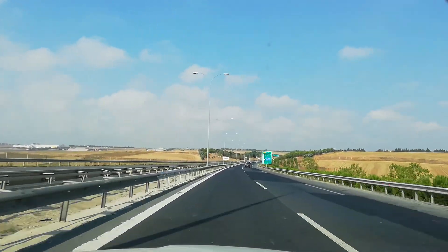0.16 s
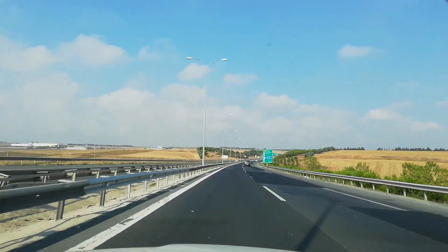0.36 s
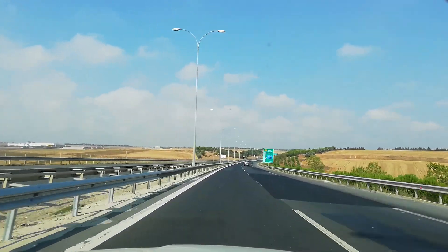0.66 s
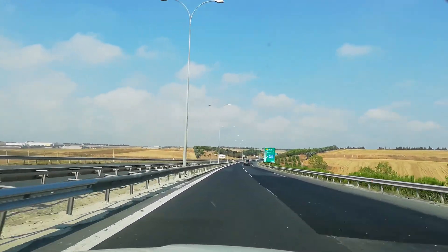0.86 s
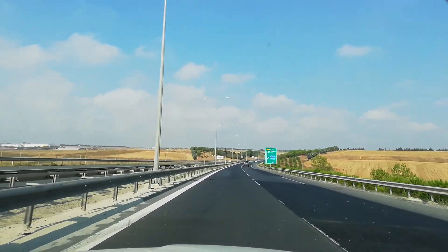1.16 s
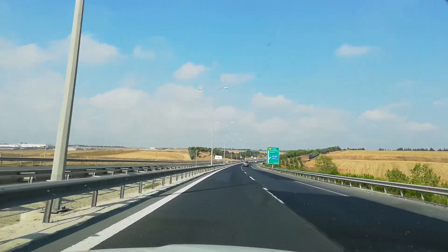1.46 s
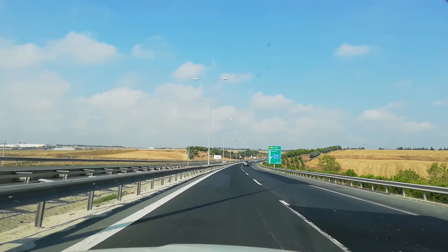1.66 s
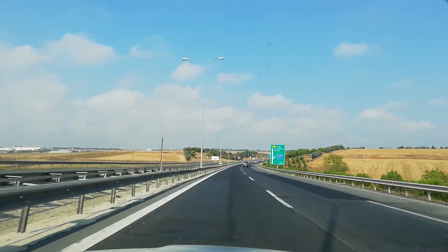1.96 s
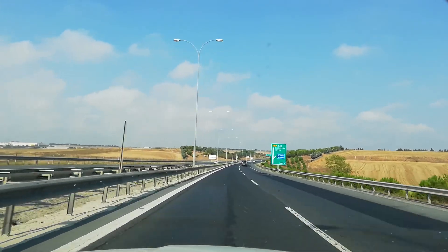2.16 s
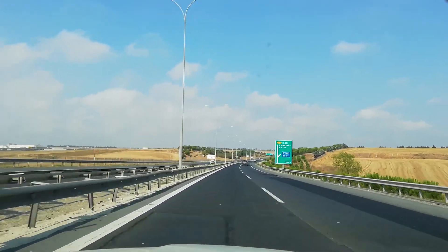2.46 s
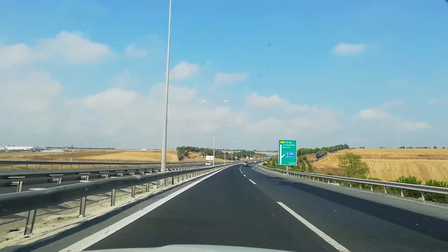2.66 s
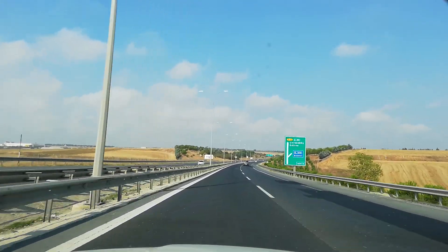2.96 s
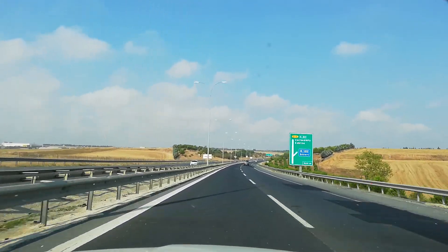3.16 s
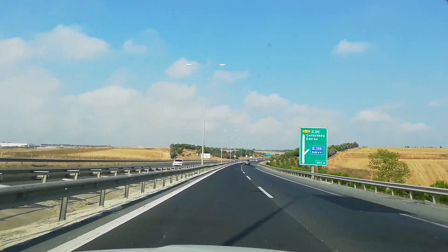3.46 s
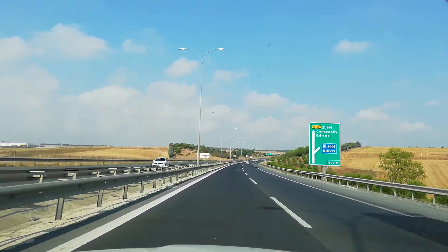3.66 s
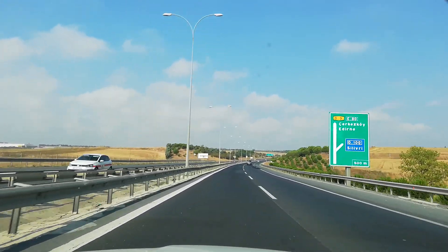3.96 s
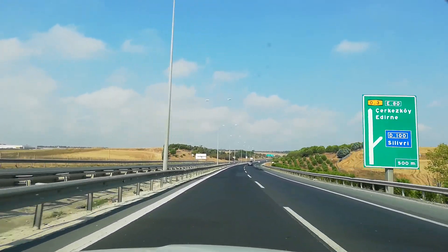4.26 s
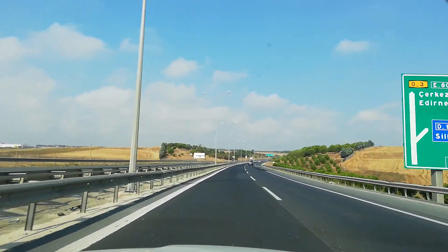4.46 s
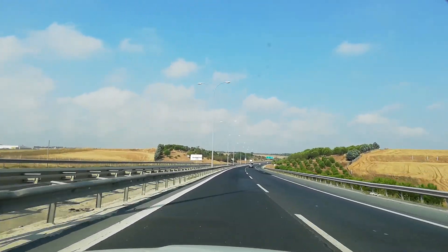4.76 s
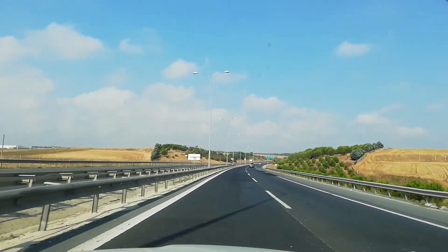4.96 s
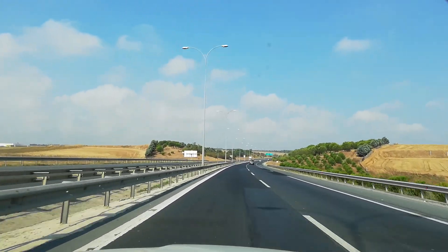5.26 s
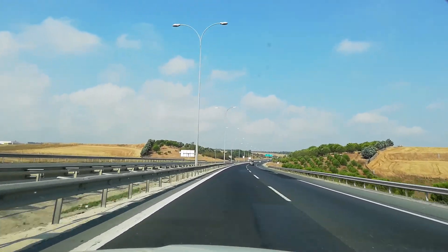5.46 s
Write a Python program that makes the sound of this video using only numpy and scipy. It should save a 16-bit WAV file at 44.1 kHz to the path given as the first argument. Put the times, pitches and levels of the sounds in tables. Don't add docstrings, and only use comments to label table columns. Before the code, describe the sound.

Steady low cabin rumble of a car at motorway speed, swelling over rough patches, while loose plastic trim rustles and ticks faintly.

```python
import sys
import numpy as np
from scipy import signal
from scipy.fft import rfft, irfft, next_fast_len
from scipy.io import wavfile
from scipy.ndimage import uniform_filter1d

SR = 44100
rng = np.random.default_rng(int(sys.argv[2]) if len(sys.argv) > 2 else 0)


def how_loud(loudness_db):
    steps = np.asarray(loudness_db, float) / 20
    return 10 ** steps


def log_audio(samples):
    frames = np.atleast_2d(samples).T
    limited = np.clip(frames, -1, 1)
    pcm = np.round(limited * 32767).astype(np.int16)
    wavfile.write(sys.argv[1], SR, pcm)


N = 246945
STEP = 32
ROAR_LAG_S, SHAKE_LAG_S = 0.000594, 0.00016

# (centre [Hz], width [Hz], level [dB])
SUSPENSION_MODES = [(13.7, 3.5, -0.5), (23, 6, 4.5), (38.5, 9.4, -5)]
CABIN_AIR_MODES = [(50.1, 7.4, 0.3), (64.5, 17, -5), (81.3, 14.5, -8)]
FLOOR_MODES = [(124.1, 7.2, 1.6), (141.1, 31.4, -1.4), (98, 30, -2.8)]
DOOR_MODES = [(195, 54, -0.5), (224.7, 17.6, -2.5), (256, 48, -4)]
SMOOTH_DB = [-32.5, -30, -29.5, -33]
YIELD_DB = [0.1, 3.4, 1.9, -1]
WAVE_SHARE = [1.7, 0.78, .4, 0.047]
# (time [s], level [dB])
WAVINESS = [(0, -1), (.35, -0.5), (.7, 2.5), (1.4, -1), (1.75, 0), (2.3, 6), (3.0, 1.5), (3.3, 0.1),
            (4.15, 0), (4.8, 2.5), (5.15, -0.5), (5.6, 3)]
# (middle [s], length [s], level [dB], shaking rate [Hz])
BUMPS = [(0.442, 0.1, -15, 130), (0.514, 0.083, -14, 23), (0.538, 0.19, -15.5, 111), (0.61, 0.265, -22, 52),
         (0.855, 0.33, -27, 139), (0.892, .26, -23, 48), (1.283, 0.32, -22.5, 70), (2.0, 0.34, -26.5, 195),
         (1.86, 0.15, -22, 152), (1.946, 0.19, -19.5, 135.5), (2.025, 0.12, -12.5, 63.3),
         (2.115, 0.053, -10.5, 54.3), (2.225, 0.45, -21, 115), (2.34, 0.27, -18, 52),
         (2.285, 0.5, -18, 22.5), (2.564, 0.07, -13, 21.8), (2.688, 0.3, -15, 28.2),
         (2.797, 0.28, -22.5, 212), (2.871, 0.23, -16, 126), (2.9, 0.55, -15.5, 24.2),
         (2.945, 0.27, -18, 54.5), (3.11, 0.18, -23, 72), (3.826, 0.059, -32, 55), (4.35, 0.18, -28, 134),
         (4.5, .12, -30, 52), (4.693, 0.11, -21, 240), (4.82, 0.37, -22.5, 40), (3.38, 0.069, -31, 125),
         (5.575, 0.29, -10.5, 33), (0.235, 0.24, -27, 109)]
# (frequency [Hz], likeness [0-1], extra left lag [rad], left minus right [dB])
SHAKE_PORTS = [(70, 1, 0.016, 0.1), (95, 0.99, 0.052, -0.4), (128, 0.99, 0.094, 0.2),
               (202, .96, .05, -0.15), (266, 0.87, .2, -1.5)]

# (frequency [Hz], density [dB/Hz])
ROAR_COLOUR = [(150, -61), (260, -8), (360, 1.5), (430, -20), (700, -13), (1000, -17.5), (1500, -22),
               (2000, -28), (2600, -35.5), (4300, -37), (6000, -47.5), (9000, -53), (15500, -76)]
# (centre [Hz], width [Hz], density [dB/Hz])
ROAR_RINGS = [(290.9, 19, 4.5), (326, 60, -8.5), (445, 20, -8), (463.7, 21, -6.5), (592, 48, -14.5),
              (765.3, 9.7, 1), (880, 56, -18), (1074, 29, -17), (1307, 10.3, -8), (1633, 7.9, -15),
              (1996, 13, -29.5), (2070, 41, -32), (2230, 40, -29.5)]
# (time [s], level [dB])
ROAR_SWELL = [(0.0, -47.5), (0.3, -47.5), (0.56, -49.5), (0.75, -48), (1.7, -47), (2.39, -49.5),
              (2.7, -48.5), (2.97, -49), (3.2, -47), (4.3, -46.5), (5.6, -47.5)]
# (frequency [Hz], likeness [0-1], extra left lag [rad], left minus right [dB])
ROAR_PORTS = [(340, 0.3, 0.5, -4), (411, 0, 0.45, -6), (432, 0, 1.13, -0.5), (575, 0.88, 1.5, 0.5),
              (780, 0.74, 0.27, -5), (1070, 0.68, 0.15, 0), (1300, 0, 0.12, -12.5),
              (1380, 0.36, 0.12, -0.5), (1700, 0.22, .1, -9), (1830, 0, 0.07, -4.5), (2030, 0, .1, -4),
              (4300, 0.2, 0.08, -5.5), (6400, 0, .1, -6.5), (15000, .05, .1, -2.5)]

# (frequency [Hz], density [dB/Hz])
RUSTLE_COLOUR = [(2500, -29.5), (4200, -13.5), (6000, -12), (7600, -4), (10300, -1), (12500, -10),
                 (15500, -20)]
# (frequency [Hz], likeness [0-1], extra left lag [rad], left minus right [dB])
RUSTLE_PORTS = [(6000, 0.1, .1, 2), (8000, .2, .1, -7), (10500, 0, .1, -17), (15000, .2, .1, -4)]
# (start [s], length [s], final level [dB], swell [dB])
RUBS = [(.05, 0.073, -61.5, 8), (0.129, 0.027, -60, -1), (.4, 0.057, -64.5, 6), (0.497, .19, -65, 5),
        (1.995, .17, -62, 9), (2.168, .22, -59.5, 0), (2.386, .045, -55.5, -2), (2.436, 0.04, -55, 2),
        (2.583, .035, -70, 4), (2.678, 0.06, -68, 5), (2.79, 0.038, -64.5, 5), (2.888, 0.066, -69, -2),
        (2.985, .05, -67, 3), (3.117, .2, -66.5, -2), (3.32, 0.12, -64, 1), (3.914, .07, -61.5, 3),
        (4.012, 0.11, -61, 2), (4.4, .13, -74, 3), (5.03, 0.027, -78, 1), (5.4, 0.1, -70, 0),
        (5.535, 0.076, -71, -6)]

# (time [s], peak [dB], low ring relative [dB], left minus right [dB], chatter centre [Hz])
TICKS = [(.1364, -44, -45, 7, 7800), (.419, -52.5, -29, -5, 10000), (.462, -48, -26, -4, 9500),
         (2.0304, -52, -30, -4, 10000), (2.1728, -40.5, -31, -2, 9000), (2.2224, -44.5, -38.5, -8.5, 10200),
         (2.287, -53, -35, -8, 12500), (2.2925, -46, -40, -14, 14000), (2.328, -46, -45, -10, 4600),
         (2.4014, -42.5, -45, -12.5, 10000), (2.621, -53, -35, -10, 9500), (2.6362, -39, -18, -14.5, 8660),
         (2.6947, -47.5, -30, -2, 8000), (2.735, -48, -23, -9, 9050), (2.798, -57, -32, -5, 10000),
         (2.819, -50, -28, -12, 8000), (2.901, -39.5, -25, -3.5, 10000), (2.917, -55, -35, -9, 12000),
         (2.9884, -53, -30, -9, 9000), (3.124, -55, -48, -7, 10000), (4.5094, -56, -30, -8.5, 10000),
         (5.0394, -52, -30, -8, 9000), (5.474, -43, -30, -2, 9000), (5.4967, -46, -26, -12, 9500)]
# (frequency [Hz], level [dB], t60 [s])
TRIM_RINGS = [(1624, 4.5, 0.024), (2310, -5, 0.015), (2930, -5, 0.027), (4000, -22, 0.0032),
              (4530, -7.5, 0.012), (5650, -12, 0.0067)]
# (frequency [Hz], gain [dB])
TICK_SHADE = [(5000, -1), (9000, -4), (11000, -18), (15500, -4)]
# (frequency [Hz], density [dB/Hz])
SNAP_COLOUR = [(1200, -15.5), (2500, 6.5), (4500, 3), (8800, -8.5), (11500, -2), (15500, -19.5)]

# (time [s], level [dB], pitch [Hz])
SQUEAK = [
    (4.55, -97, 6450),
    (4.7, -84, 6500),
    (5.2, -80, 6480),
    (5.3, -95, 6480),
]


def evened(x):
    return x / np.sqrt(np.mean(x ** 2) + 1e-20)


def steadied(x, size):
    power = uniform_filter1d(uniform_filter1d((x ** 2).mean(0), size), size)
    return evened(x / np.sqrt(abs(power) + 0.12))


def filled(coarse):
    return np.repeat(coarse, repeats=STEP)[:N]


def read(points, hz):
    f, *columns = np.transpose(points)
    return [np.interp(np.log(hz + 1), np.log(f + 1), c) for c in columns]


def follow(rows):
    s, *columns = np.transpose(rows)
    return [np.interp(np.arange(N) / SR, s, c) for c in columns]


def rings(modes, hz, steep=1.653):
    return np.sqrt(sum(how_loud(db) ** 2 / (1 + (2 * (hz - f) / w) ** 2) ** steep for f, w, db in modes))


def field(colour, ports, lag_s, size, patchy_db, flicker_db):
    frames, hz = 4 * N // size + 5, np.fft.rfftfreq(size, 1 / SR)
    a, b, c, d, patches = rng.standard_normal((frames, len(hz), 5)).T
    patches = uniform_filter1d(patches, size=10, axis=0)
    patches = evened(uniform_filter1d(patches, size=8, axis=1))
    flicker = evened(uniform_filter1d(rng.standard_normal(frames), size=3))

    same, lag_rad, left_db = read(ports, hz)
    same = np.clip(same, 0, 1)[:, None]
    right = a + 1j * b
    left = same * right + np.sqrt(1 - same ** 2) * (c + 1j * d)
    left *= (how_loud(left_db) * np.exp(-1j * (lag_rad + 2 * np.pi * hz * lag_s)))[:, None]

    z = np.array([left, right]) * colour(hz)[:, None]
    z = z * how_loud(patchy_db * patches + flicker_db * flicker)
    return evened(signal.istft(z, nperseg=size, noverlap=size - size // 4)[1][:, :N])


def road_shake():
    reach_db_per_octave = 15.5
    out, t, size = np.zeros((2, N)), np.arange(0, N, STEP) / SR, next_fast_len(N)
    hz = np.fft.rfftfreq(size, 1 / SR)
    s, length_s, bump_db, bump_hz = np.transpose(BUMPS)
    humps = np.cos(np.pi * np.clip((t[:, None] - s) / length_s, -.5, .5)) ** 2
    wave_db = follow(WAVINESS)[0][::STEP]
    parts = (SUSPENSION_MODES, CABIN_AIR_MODES, FLOOR_MODES, DOOR_MODES)
    for smooth_db, yield_db, share, modes in zip(SMOOTH_DB, YIELD_DB, WAVE_SHARE, parts):
        ringing = field(lambda f: rings(modes, f) * (f > 4), SHAKE_PORTS, SHAKE_LAG_S,
                        size=8192, patchy_db=-2.24, flicker_db=-1.92)
        spectrum = rfft(steadied(ringing, size=3000), size) / rings(modes, hz) ** 2
        smooth = how_loud(smooth_db + share * wave_db)
        for mode in modes:
            octaves = abs(np.log2(bump_hz / mode[0]))
            reach_db = bump_db + yield_db - reach_db_per_octave * octaves
            level = np.sqrt(smooth ** 2 + humps ** 2 @ how_loud(reach_db) ** 2)
            one_mode = irfft(spectrum * rings([mode], hz) ** 2, size)[:, :N]
            out += uniform_filter1d(filled(level), STEP) * one_mode
    return out


def roar():
    ripple = evened(uniform_filter1d(rng.standard_normal(1025), size=3))

    def colour(hz):
        smooth = np.hypot(how_loud(read(ROAR_COLOUR, hz)[0]), rings(ROAR_RINGS, hz))
        return smooth * how_loud(0.25 * ripple * (hz > 2300))

    noise = field(colour, ROAR_PORTS, ROAR_LAG_S, size=2048, patchy_db=0.26, flicker_db=0.68)
    return how_loud(follow(ROAR_SWELL)[0] + 14.0) * noise


def rustle():
    rise_s, t60_s, rest_db = 0.011, 0.15, -69.5
    hiss = field(lambda hz: how_loud(read(RUSTLE_COLOUR, hz)[0]), RUSTLE_PORTS, ROAR_LAG_S,
                 size=256, patchy_db=1.5, flicker_db=0.5)
    t, power = np.arange(0, N, STEP) / SR, how_loud(rest_db) ** 2
    for start_s, length_s, final_db, swell_db in RUBS:
        left_s = start_s + length_s - t
        swelling_db = final_db - swell_db * np.clip(left_s / length_s, 0, 1)
        level_db = swelling_db + 60 * np.minimum(left_s, 0) / t60_s
        power = power + (how_loud(level_db) * np.clip((t - start_s) / rise_s, 0, 1)) ** 2
    return how_loud(1.0) * filled(np.sqrt(power)) * hiss


def ticks():
    chatter_t60_s, solid_db = 0.045, -27
    t, out = np.arange(4096) / SR, np.zeros((2, N + 4096))
    hz = np.fft.rfftfreq(len(t), 1 / SR)
    noise = rng.standard_normal((len(TICKS), 2, len(t)))
    shade = how_loud([read(TICK_SHADE, hz)[0], 0 * hz])
    ring = sum(how_loud(db - 60 * t / t60) * np.sin(2 * np.pi * f * t) for f, db, t60 in TRIM_RINGS)
    late = np.exp(-2j * np.pi * hz * 0.000404)
    for (s, db, ring_db, pan_db, centre_hz), puff in zip(TICKS, noise):
        t60_s = chatter_t60_s / how_loud(.8 * max(ring_db - solid_db, 0))
        t60_s *= min(10500 / centre_hz, 1) ** 3
        contact = how_loud(read(SNAP_COLOUR, hz)[0] + 0.46 * ring_db + 7.5)
        colour = np.hypot(contact, rings([(centre_hz, 0.31 * centre_hz, 0)], hz))
        colour = colour / np.sqrt(np.mean(colour ** 2))
        chatter = puff * (how_loud(-60 * t / t60_s) + how_loud(-15.0 - 60 * t / .12))
        blow = 5.9 * (t == 0) + chatter
        snap = irfft(rfft(blow) * late * shade * colour)
        rise = np.minimum(t / 0.00028, 1)
        tick = how_loud(db - 7.0) * rise * (snap + how_loud(ring_db + 22.5) * ring)
        at = round(s * SR)
        out[:, at:at + len(t)] += tick * how_loud([[pan_db / 2], [-pan_db / 2]])
    return out[:, :N]


def squeak():
    db, hz = follow(SQUEAK)
    waver = evened(uniform_filter1d(rng.standard_normal((2, N)), size=900))
    return how_loud(db + 3.9 * waver[0]) * np.sin(2 * np.pi * np.cumsum(hz + 25 * waver[1]) / SR)


def scene():
    return road_shake() + roar() + rustle() + ticks() + squeak()


def low_pass(x):
    return signal.sosfilt(signal.butter(12, 15740, fs=SR, output="sos"), x)


def record(dry):
    peak_db = 20 * np.log10(abs(dry).max(0) + 1e-6)
    fall_db = np.arange(N) * 9.1 / SR
    held_db = np.maximum.accumulate(peak_db + fall_db) - fall_db
    over_db = np.maximum(held_db + 7.0, 0)
    ducked = dry / how_loud(0.8 * uniform_filter1d(over_db, size=300))
    ducked *= np.minimum(np.arange(N, 0, -1) / (.006 * SR) + .2, 1)
    return low_pass(ducked)


dry = scene()
out = record(dry)
log_audio(out)
```